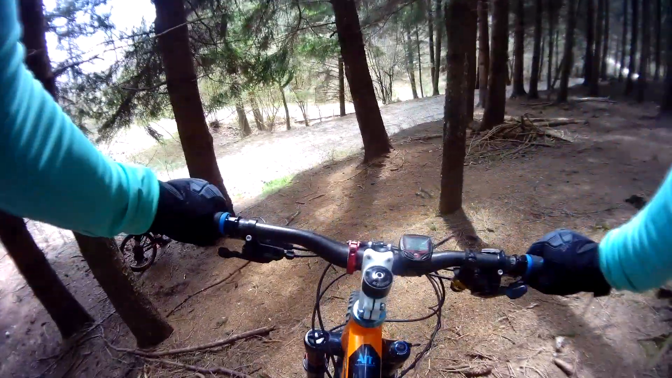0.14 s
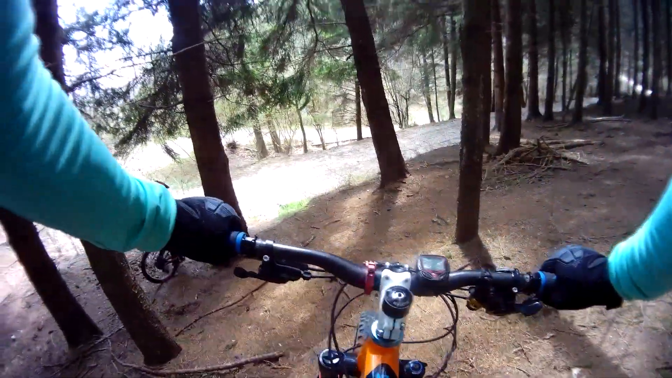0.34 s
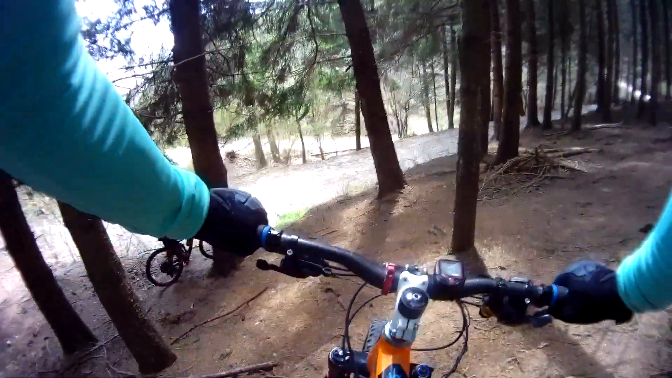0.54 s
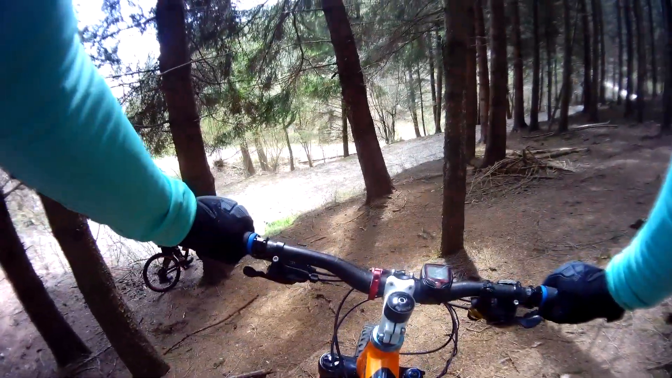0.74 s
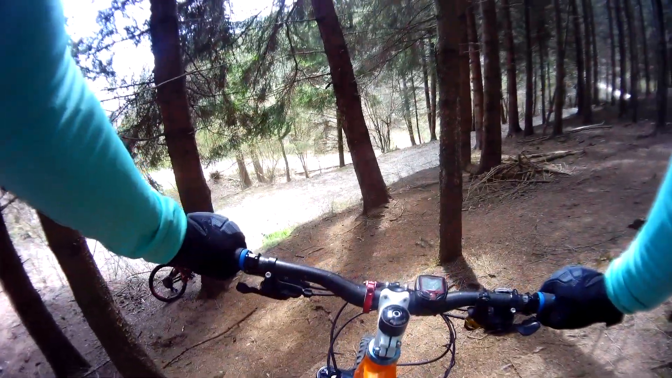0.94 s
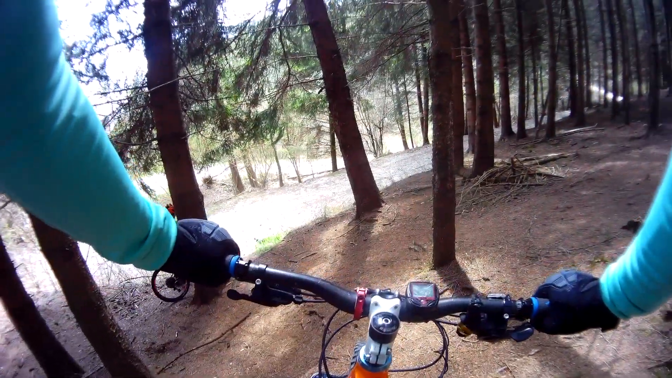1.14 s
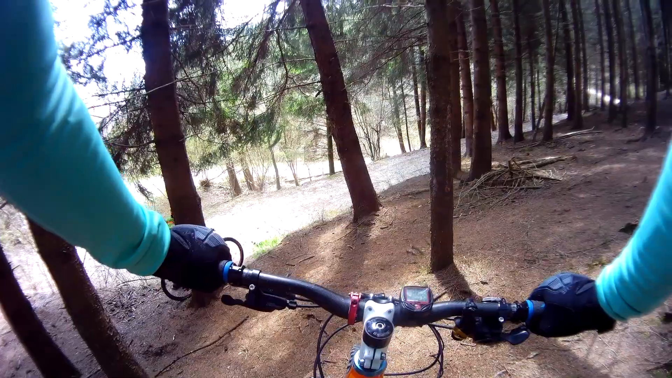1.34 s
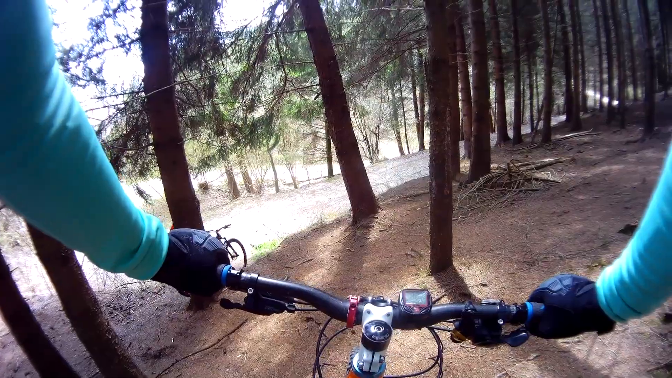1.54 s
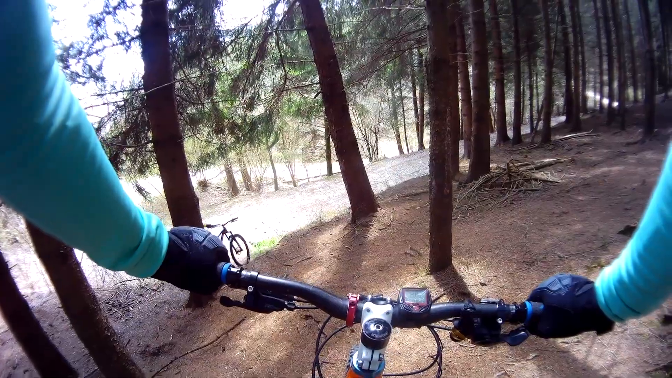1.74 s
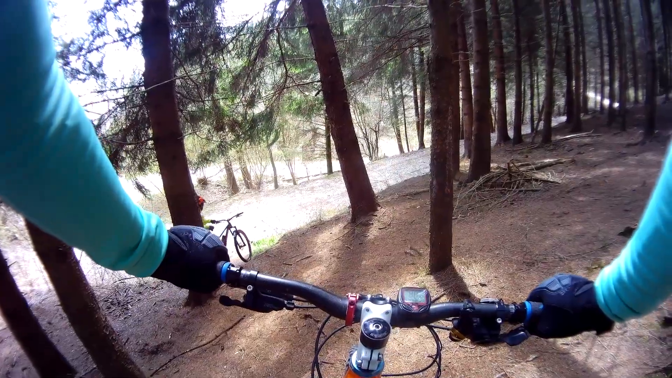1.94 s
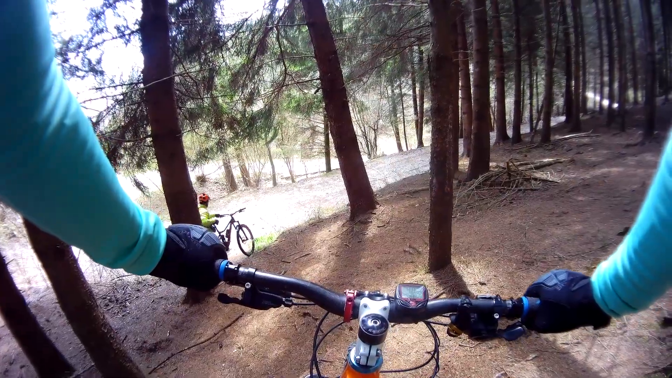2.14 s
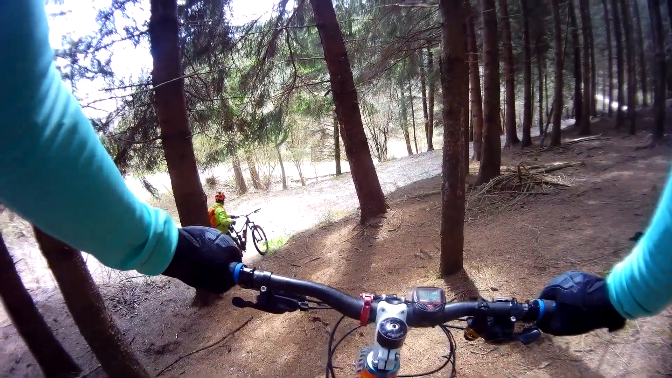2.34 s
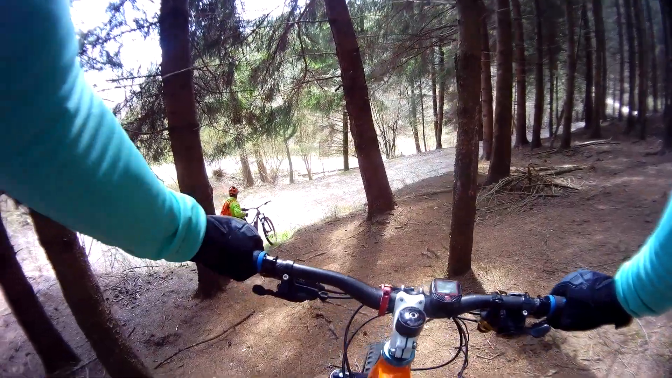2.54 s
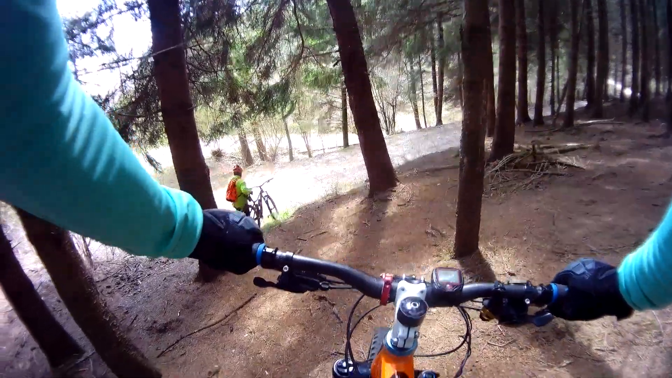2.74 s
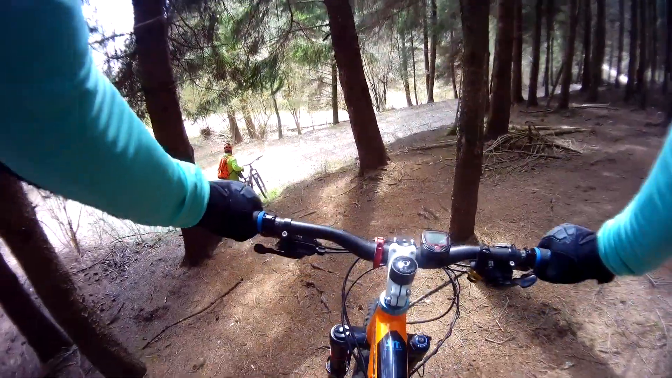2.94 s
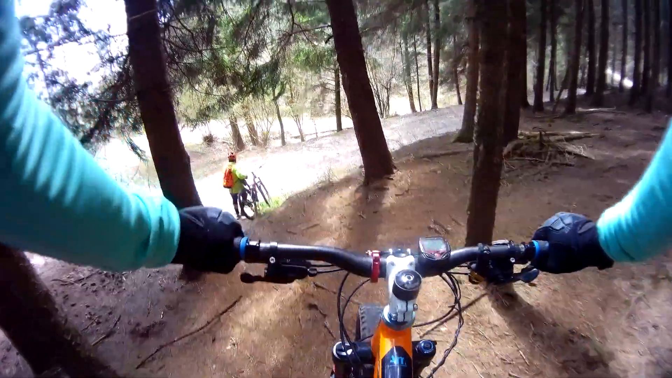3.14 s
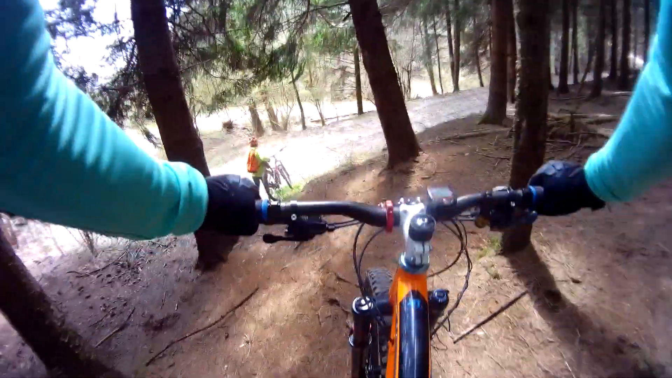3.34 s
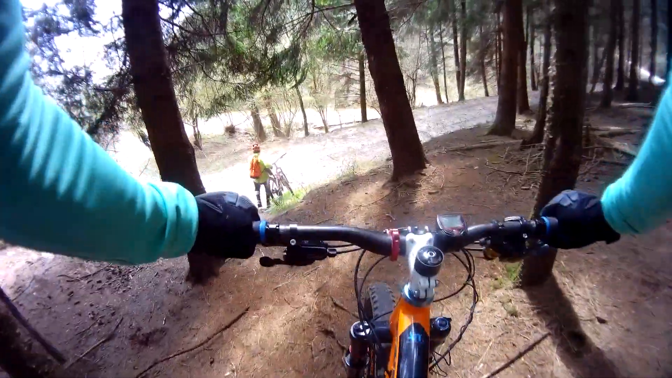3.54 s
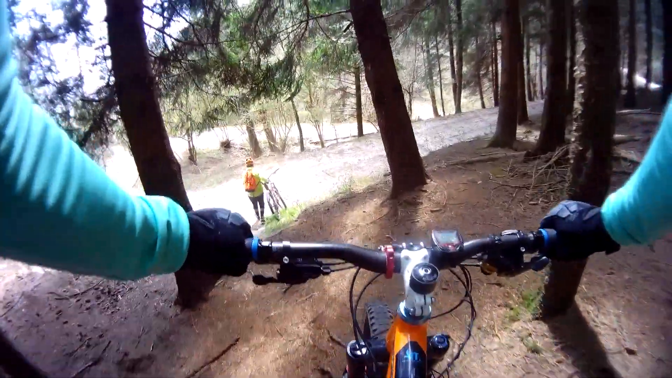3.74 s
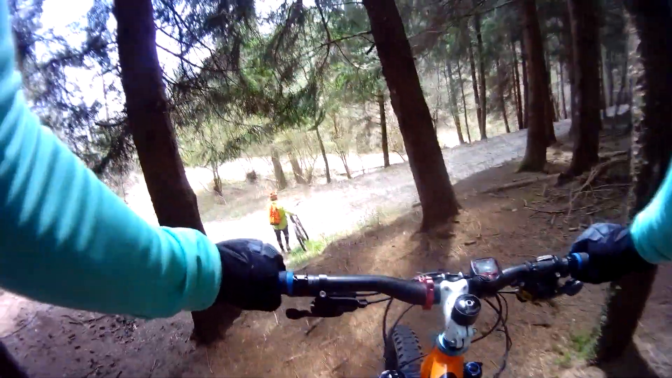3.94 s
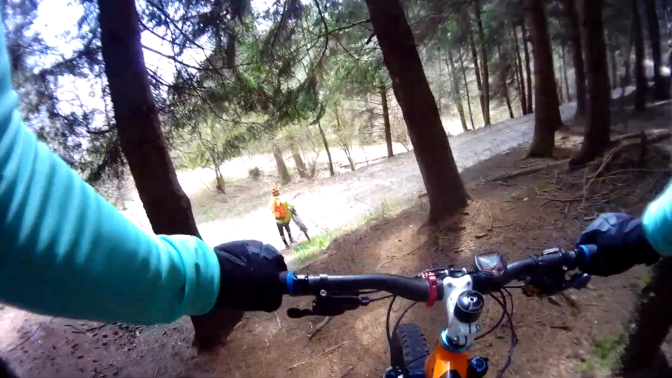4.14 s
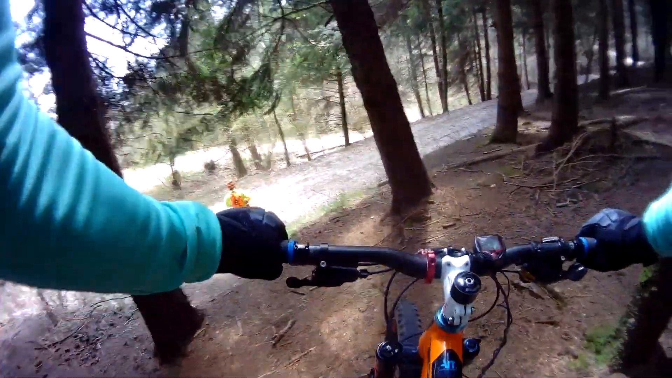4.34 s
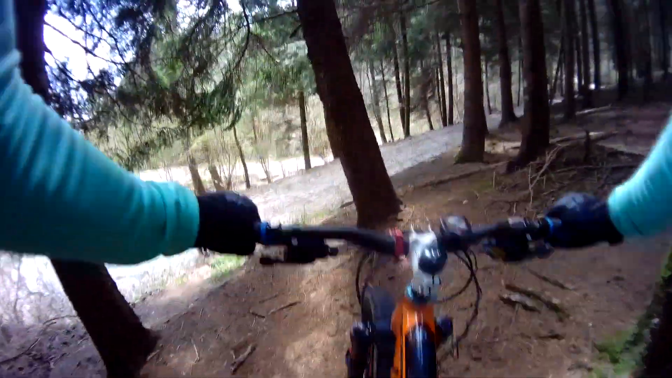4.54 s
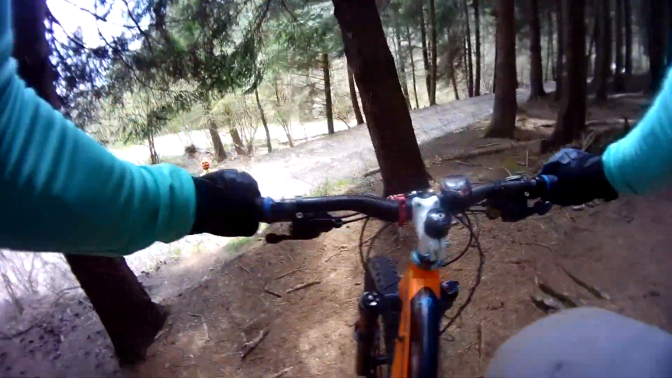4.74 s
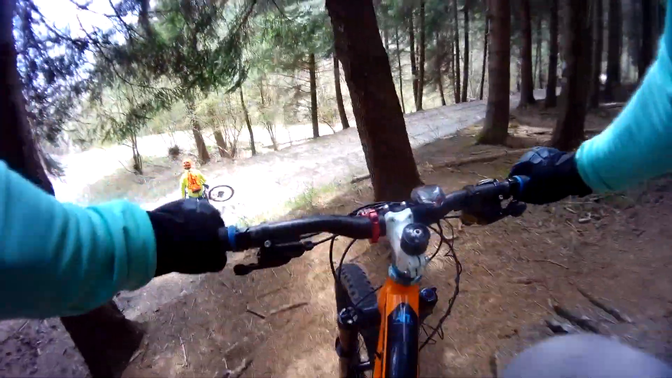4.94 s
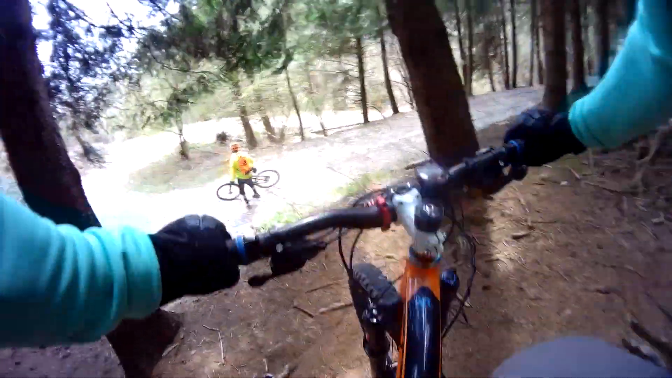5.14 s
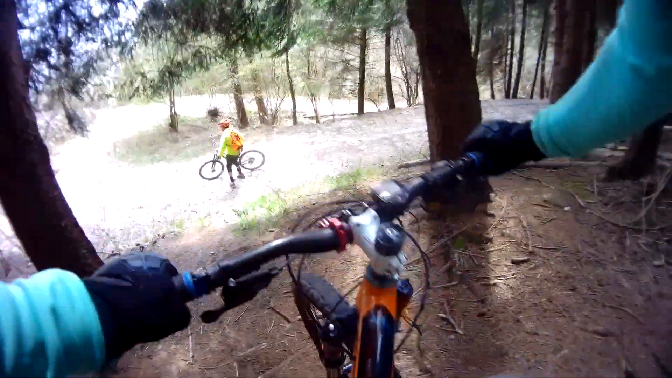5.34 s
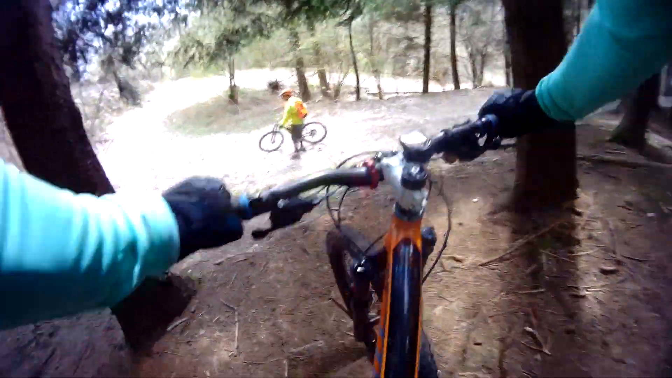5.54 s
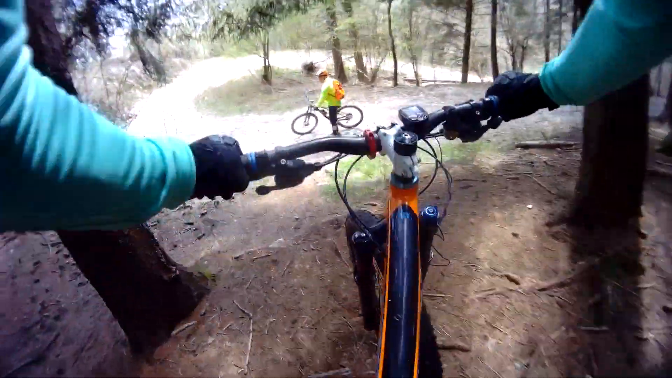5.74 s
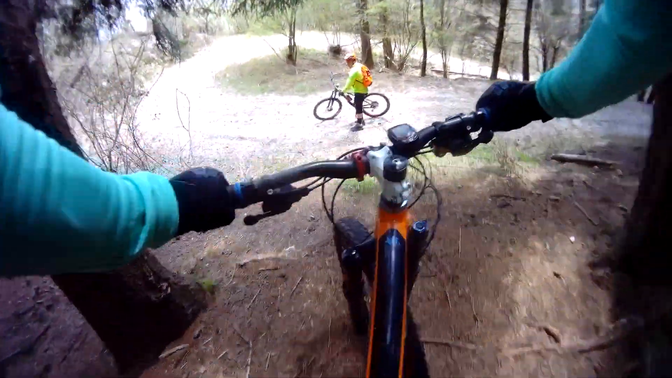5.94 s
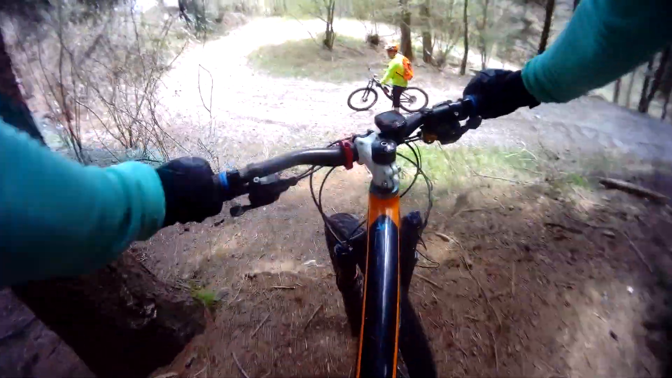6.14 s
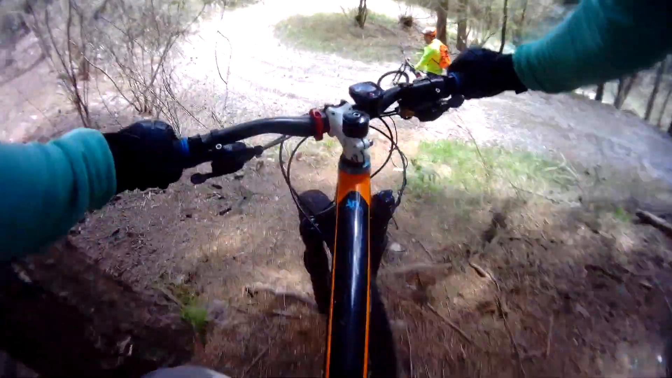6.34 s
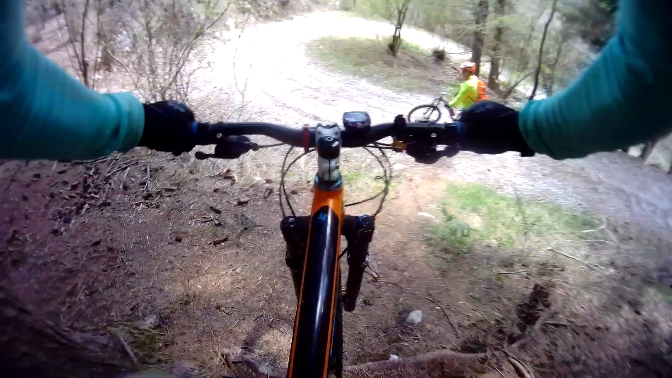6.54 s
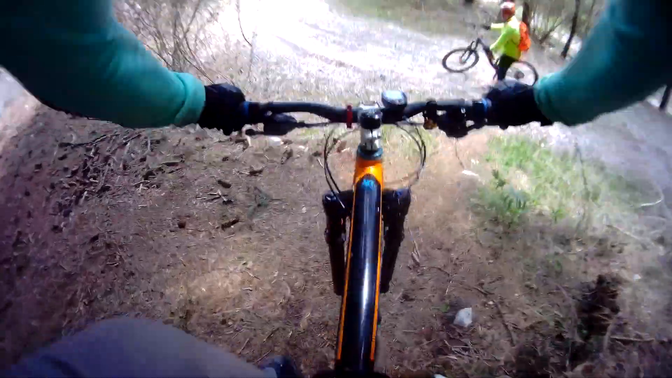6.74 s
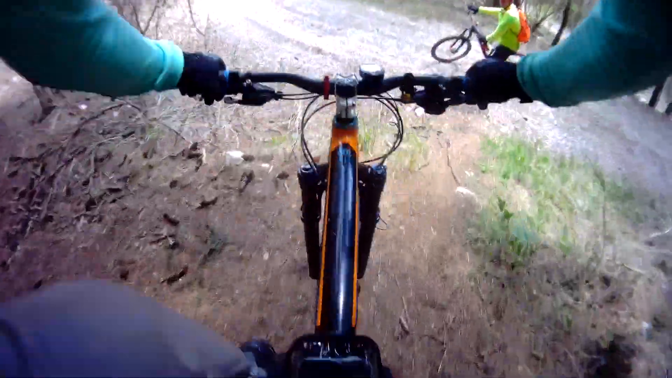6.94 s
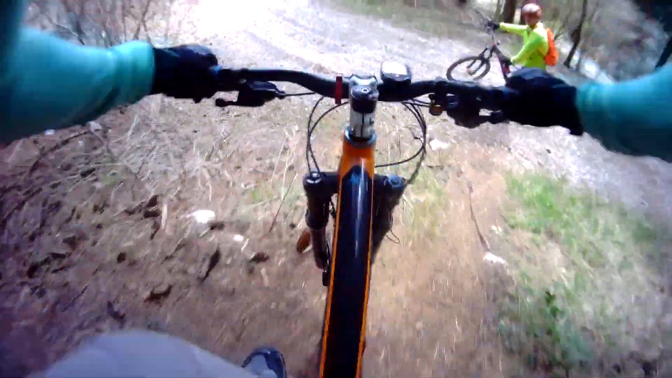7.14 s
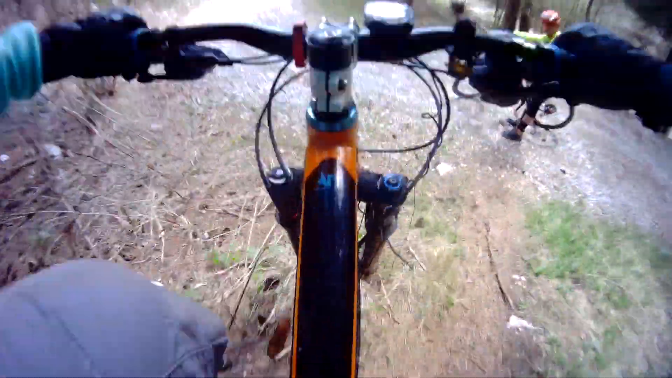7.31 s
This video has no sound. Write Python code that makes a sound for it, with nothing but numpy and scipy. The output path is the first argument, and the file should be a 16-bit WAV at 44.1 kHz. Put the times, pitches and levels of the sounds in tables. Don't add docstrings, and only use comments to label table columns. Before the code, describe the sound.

A mountain bike creeps with a slowing, ticking freewheel, nearly stops, then rolls down a dirt forest trail with crunching needles, snapping twigs and hard knocks.

```python
import sys
import numpy as np
from scipy import signal
from scipy.fft import rfft, irfft, next_fast_len
from scipy.io import wavfile
from scipy.ndimage import uniform_filter1d

SR = 44100
rng = np.random.default_rng(int(sys.argv[2]) if len(sys.argv) > 2 else 0)


def invert_db(level):
    return 10 ** (np.asarray(level, dtype=float) / 20)


def int16_out(signal):
    q = np.round(np.clip(np.atleast_2d(signal).T, -1, 1) * 32767)
    wavfile.write(sys.argv[1], SR, q.astype(np.int16))


N = 329471
TIME = np.arange(N) / SR

# time in seconds, weight on the tread in dB, litter dryness (crackle over crush) in dB.
ROLLING = [(0.0, -30.5, -10.5), (0.08, -44.5, -6.5), (0.58, -47.5, -8), (1.08, -71, 4), (1.52, -61, -6),
           (2.12, -68.5, -6), (2.43, -57.5, -9.5), (2.64, -48, -10), (3.1, -45, -6), (3.35, -40, -11),
           (4.02, -38, -13), (4.33, -43.5, -5), (4.76, -34, -12.5), (5.47, -42, -8), (5.85, -35.5, -10),
           (6.51, -40.5, -7), (7.05, -44.5, -3.5), (7.47, -34.5, -9)]
# time in seconds, tread swell in dB, housing jolt in dB, half length in seconds.
ROOTS = [(.17, 0, 15, .12), (0.447, 5.5, 25, 0.085), (2.698, 1, 6, 0.096), (3.208, -3, 11, .08),
         (3.638, 2, 15, 0.17), (4.176, 0, 7, 0.074), (4.468, 4, 15, .07), (4.614, 10.5, 13, 0.16),
         (5.076, 6.5, 12.5, 0.16), (5.264, 3, 9, 0.14), (5.381, 2, 10, 0.055), (5.661, 6, 6, 0.051),
         (5.92, -3, 2, 0.13), (6.18, 3, 12.5, 0.061), (6.285, 0.5, 12.5, 0.079), (6.658, 11, 4, 0.16),
         (6.903, 6.5, 13.5, 0.098), (7.015, -4, 9, 0.065), (7.255, 11, 13.5, 0.63)]
# start in seconds, level in dB, decay (t60) in seconds.
SKIDS = [
    (0.245, -59, 0.22),
    (0.389, -38.5, 0.22),
    (.72, -54, 2.9),
    (2.47, -55, 0.3),
    (3.029, -44.5, 0.97),
    (3.252, -38.5, 0.24),
    (5.408, -25.5, 0.038),
]
# start in seconds, end in seconds, extra crackle in dB.
DRY_PATCH = (3.2, 4.2, 4.1)
# frequency in Hz, level in dB per Hz.
CRUSH_COLOUR = [(71, -33), (120, -12.5), (292, -3), (412, 1.5), (941, -0.5), (1230, -0.5), (1460, -7),
                (2050, -4.5), (3830, -24.5), (5000, -27.5), (6500, -28), (11000, -120)]
# frequency in Hz, level in dB per Hz.
CRACKLE_COLOUR = [(2060, -18.5), (3500, -11.5), (3870, -18), (4600, -10.5), (5860, -7.5), (7900, -16.5),
                  (8910, -10), (10300, -13.5), (12400, -9), (14700, 0.5), (15300, 1.5), (16000, -6)]
CRACKLE_SHARE = 0.63

# time in seconds, peak in dB.
TEETH_SLOWING = [(0.151, -28.5), (0.276, -27), (.3483, -38), (0.3854, -28), (0.416, -28), (0.4883, -27),
                 (0.593, -28.5), (0.702, -29.5), (0.818, -28), (0.9377, -33.5), (1.044, -33.5),
                 (1.132, -35), (1.221, -37.5), (1.286, -48.5), (1.311, -36.5), (1.3995, -36.5),
                 (1.488, -38.5), (1.566, -38), (1.6159, -51), (1.648, -38), (1.7296, -46), (1.829, -47),
                 (1.941, -50), (2.0426, -49)]
# time in seconds, peak in dB.
TEETH_GAINING = [(2.127, -53), (2.21, -48), (2.2892, -46), (2.3592, -41.5), (2.4287, -39), (2.468, -34.5),
                 (2.487, -38), (2.5444, -39), (2.606, -37.5), (2.673, -34), (2.7374, -37), (2.806, -40),
                 (2.8447, -46), (2.877, -36.5), (2.9553, -37), (3.0474, -38), (3.085, -37), (3.124, -39),
                 (3.163, -42), (3.2078, -34.5), (3.277, -31), (3.3495, -38), (3.4702, -48), (3.5415, -34)]
# frequency in Hz, level in dB per Hz.
PAWL_COLOUR = [(2060, -30), (3500, -15), (4750, -17), (6400, -9.5), (7720, -45), (9760, -12),
               (10500, -17.5), (13400, 7), (15800, -13), (16500, -30)]
PAWL_T60_S = 0.056
HUB_FREE_DB, HUB_LOADED_DB, HUB_SLOPE = -16.5, -9, -0.18

# time in seconds, peak in dB, decay (t60) in seconds.
SNAPS = [(0.0544, -19.5, 0.015), (3.6603, -25, 0.012), (3.7362, -8, 0.007), (3.958, -35, 0.022),
         (4.1555, -8.5, 0.062), (4.2474, -15, 0.054), (4.307, -22, 0.027), (4.418, -24, 0.072),
         (4.4415, -15, 0.013), (4.533, -14.5, 0.057), (4.607, -21, 0.018), (4.656, -17, 0.02),
         (4.6895, -18.5, 0.05), (4.8504, -29, 0.022), (5.029, -19, 0.023), (5.101, -16.5, 0.036),
         (5.2672, -19, 0.026), (5.889, -28, 0.018), (6.1794, -39, 0.02), (6.542, -24, 0.1),
         (6.6248, -23, 0.029), (6.9674, -24, 0.026), (7.29, -12.5, 0.021), (7.3218, -32, 0.018),
         (7.3755, -29, 0.013), (7.379, -18, 0.016), (7.443, -20, 0.031)]
# frequency in Hz, level in dB per Hz.
SNAP_COLOUR = [(1760, -29), (3000, -12.5), (4110, -23), (5910, -1.5), (7370, -16.5), (8140, -15),
               (9190, -6), (10400, -11), (12000, -8), (14700, 6.5), (16500, -6.5)]

# time in seconds, peak in dB, pitch in Hz, decay (t60) in seconds.
TAPS = [(.032, -28, 503, .043), (.152, -33, 557, 0.055), (.244, -29.5, 1310, 0.11), (.39, -27, 1220, 0.049),
        (.401, -32, 388, 0.027), (.422, -26.5, 1160, 0.079), (.457, -33, 444, 0.045),
        (1.288, -44, 1000, 0.027), (1.312, -43.5, 1607, 0.099), (1.352, -38.5, 1160, 0.13),
        (1.388, -43, 1590, 0.15), (1.841, -44.5, 1047, 0.051), (2.467, -32.5, 1750, 0.038),
        (3.029, -27, 1080, 0.055), (3.251, -33, 845, 0.028), (4.1495, -20, 1820, 0.043),
        (4.416, -24, 630, 0.098), (4.795, -23.5, 510, 0.026), (6.584, -15, 568, 0.086),
        (5.543, -24.5, 865, 0.072), (5.594, -24, 1010, 0.034)]
# time in seconds, peak in dB, pitch in Hz, decay (t60) in seconds.
CLACKS = [
    (.052, -22, 482, 0.05),
    (.443, -33.5, 558, 0.072),
    (3.736, -20, 1640, 0.079),
    (3.787, -27, 645, 0.099),
    (3.967, -27, 494, 0.071),
    (4.431, -18.5, 960, 0.091),
    (5.264, -34, 1300, .037),
    (5.41, -22, 520, 0.052),
    (6.051, -20, 960, 0.079),
    (6.79, -20, 1230, 0.035),
]
# time in seconds, peak in dB, pitch in Hz, decay
# (t60) in seconds.
BLOWS = [(3.533, -23.5, 970, 0.076), (3.586, -18.5, 2050, 0.13), (3.846, -23.5, 1290, 0.048),
         (4.157, -4.5, 1320, 0.074), (4.246, -11.5, 1200, 0.083), (4.464, -16, 756, 0.076),
         (4.527, -25, 394, 0.047), (4.544, -24, 606, 0.11), (4.6076, -2.5, 1100, 0.023),
         (5.0275, -10.5, 910, 0.031), (5.304, -10, 1710, 0.1), (5.393, -24, 564, 0.045),
         (6.142, -18, 1240, 0.038), (6.436, -21.5, 1250, 0.081), (6.457, -17.5, 465, 0.043),
         (6.5028, -7.5, 1260, .018), (6.847, -21, 503, 0.099), (6.967, -21.5, 910, 0.07),
         (7.0, -20.5, 413, 0.039), (7.17, -12.5, 895, 0.045), (7.216, -12.5, 1150, 0.041),
         (7.266, -10.5, 1010, 0.048), (7.2895, -2.5, 920, 0.085), (7.3215, -10.5, 790, 0.02)]
TAP_EDGE_DB, CLACK_EDGE_DB, BLOW_EDGE_DB = -20, 14.5, -20
THUD_DB, THUD_DB_PER_OCTAVE, THUD_DB_PER_S = -19.5, -10, 113
SOFT_RISE_S = .005
# frequency in Hz, level in dB, decay (t60) in seconds.
MOUNT_MODES = [(173.2, -38, 0.75), (370, -5.5, 0.018), (345, -27.5, 0.3), (467, -21.5, 0.12),
               (643, -4.5, 0.013), (1320, -31, 0.025), (13700, 0, 0.005)]
MOUNT_HIT_S = 0.0026
# time in seconds, peak in dB, pitch in Hz.
SPOKE_PING = (7.3738, -11.5, 5800)
# peak time in seconds, peak in dB, pitch in Hz, rise in seconds, t60 in seconds.
SHOVES = [(4.439, -23.5, 2610, .002, 0.022), (4.6152, -12, 994, 0.0026, 0.026),
          (4.6177, -17.5, 1880, 0.0039, 0.014), (4.628, -20, 750, .004, 0.05),
          (4.655, -12.5, 1950, .003, .025), (4.664, -23, 602, 0.0025, 0.052),
          (4.68, -15, 1710, 0.0013, 0.036), (4.691, -18.5, 1900, 0.0066, 0.039),
          (4.709, -24, 1880, 0.0018, 0.018), (4.741, -30, 1403, .003, 0.034),
          (4.822, -17.5, 1306, 0.0024, 0.071), (5.001, -19.5, 908, .003, 0.022),
          (5.039, -17, 1000, .002, 0.014), (5.056, -18, 1490, 0.0014, 0.026),
          (5.068, -17.5, 1195, 0.0037, 0.024), (5.104, -16.5, 1280, 0.002, 0.026),
          (5.215, -31, 2200, 0.0018, 0.046), (5.312, -16.5, 1810, .003, 0.034),
          (5.322, -25.5, 2620, 0.0027, 0.025), (5.412, -27.5, 2580, .003, 0.033),
          (5.396, -30, 2700, 0.0016, .03), (5.65, -23.5, 815, .008, 0.087), (6.48, -12, 620, 0.012, 0.11),
          (6.525, -20, 2650, .001, 0.037), (6.546, -6.5, 992.5, 0.0032, 0.032),
          (6.552, -7.5, 1102, .002, .03), (6.558, -11.5, 1039, .002, 0.072),
          (6.626, -9.5, 840, 0.0022, 0.035), (6.642, -22.5, 1680, .004, 0.038),
          (6.686, -25, 1202, 0.0022, .02), (6.735, -29, 1260, .002, .02), (6.858, -26, 2080, 0.0017, .03),
          (6.923, -31, 1260, .002, .03), (7.159, -25, 1214, 0.0034, 0.027),
          (7.283, -17.5, 690, 0.0033, 0.023), (7.296, -13, 893, .002, 0.035),
          (7.34, -15, 1275, 0.0022, 0.033), (7.35, -17, 1197, 0.0039, 0.037),
          (7.383, -11, 1952, 0.0011, 0.017), (7.424, -28, 983, .002, .04)]

# start in seconds, end in seconds, first level in dB, last level in dB.
LEVER_PULLS = [
    (2.44, 2.946, -53, -56),
    (3.023, 3.2, -46, -41),
    (3.273, 3.532, -43, -46),
    (3.777, 3.89, -40, -55),
    (4.62, 4.852, -43, -41.5),
    (5.072, 5.404, -37.5, -45.5),
    (5.606, 7.1, -37.5, -40.5),
    (7.1, 7.497, -42, -37),
]
LEVER_DB_PER_S, PAD_DRAG_DB = 202, -77
# frequency in Hz, width in Hz, level in dB.
SCRAPE_MODES = [(570, 320, -1), (1290, 163, 4), (1986, 280, -3.5), (5140, 360, -11.5), (5900, 770, -5.5)]
# frequency in Hz, width in Hz, level in dB.
DRAG_MODES = [(444, 67, 0.5), (803, 65, -6.5), (1120, 80, -3), (1347, 50, -0.5), (1654, 78, -1.5),
              (2040, 66, -4), (2750, 80, -16)]
# start in seconds, end in seconds, level in dB.
DRAGS = [
    (0.498, .7, -59.5),
    (.72, 0.937, -59),
    (2.53, 2.7, -56.5),
    (2.7, 2.993, -52),
]
# frequency in Hz, width in Hz, level in dB.
BITE_MODES = [(630, 120, -5), (1160, 120, -1), (2015, 83, -9)]
# start in seconds, end in seconds, level in dB.
BITES = [
    (3.013, 3.184, -44.5),
    (3.28, 3.5, -44.5),
    (5.617, 6.43, -48.5),
]
# frequency in Hz, width in Hz, level in dB.
HISS_MODES = [(5070, 200, -9), (5710, 150, -6), (5990, 170, -3), (6320, 200, -9)]
# start in seconds, end in seconds, level in dB.
HISSES = [
    (3.27, 3.53, -53),
    (5.62, 6.5, -59),
    (6.7, 7.1, -56),
]
# start in seconds, end in seconds, first pitch in Hz, last pitch in Hz, level in dB.
SQUEAK = (2.9, 3.02, 4400, 3950, -61)

# time in seconds, peak in dB.
GRIT = [(3.6311, -25), (3.8452, -29), (3.9384, -25), (4.2188, -24), (4.5374, -26), (4.5474, -22),
        (4.6134, -25), (4.7716, -33), (4.8763, -21), (4.881, -20), (4.9776, -29), (5.0494, -32),
        (5.1672, -35), (5.2879, -34), (5.3472, -30), (5.4605, -31), (5.4809, -35), (5.5039, -31),
        (5.5268, -29), (5.6331, -30), (5.672, -28), (5.7304, -32), (5.8591, -40), (5.875, -28),
        (5.9698, -34), (6.1494, -33), (6.2253, -36), (6.2766, -41), (6.355, -30), (6.4033, -36),
        (6.5854, -22), (6.7181, -28), (6.7361, -29), (6.778, -25), (6.8014, -25), (7.003, -30),
        (7.0244, -29), (7.1147, -28), (7.198, -34), (7.4544, -24)]
# start in seconds, end in seconds, level in dB.
SLEEVE = [
    (1.332, 1.436, -67),
    (1.616, 1.86, -70.5),
]
# start in seconds, added rumble in dB.
STEEPER = [
    (3.15, 5.5),
    (5.9, 13.5),
]
RUMBLE_UNDER_DB, BREEZE_DB = -21, -73.5
# frequency in Hz, level in dB per Hz.
WOOD_COLOUR = [(15, -27), (25, 0.5), (226, -1), (280, 3.5), (496, -2), (1220, -24), (1430, -6),
               (2270, -17.5), (2750, -10.5), (8830, -14.5), (14000, -9.5), (15200, -15), (16500, -33)]
WOOD_DB = -68.5
TOP_HZ = 15740


def unit(x):
    return x / np.sqrt(np.mean(x ** 2))


def peak(x):
    return x / abs(x).max()


def colour(x, table):
    hz, db = np.transpose(table)
    size = 4096
    grid_hz = np.arange(size // 2 + 1) * SR / size
    gain = np.interp(np.log(grid_hz + 1), np.log(hz), db) * np.log(10) / 20
    ceps = irfft(gain)
    ceps[1:size // 2] *= 2
    ceps[size // 2 + 1:] = 0
    return signal.fftconvolve(x, irfft(np.exp(rfft(ceps))))[:len(x)]


def band(x, hz, width):
    return signal.lfilter(*signal.iirpeak(hz, hz / width, fs=SR), x)


def band_twice(x, hz, width):
    return band(band(x, hz, width), hz, width)


def walk(rate):
    hold = int(SR / rate)
    steps = np.repeat(rng.standard_normal(N // hold + 1), hold)
    return unit(uniform_filter1d(uniform_filter1d(steps, hold), hold)[:N])


def gate(start, end, edge_s=.03):
    return np.clip(np.minimum(TIME - start, end - TIME) / edge_s + .5, 0, 1)


def fade(t60, size=4000):
    return invert_db(-60 * np.arange(size) / SR / max(t60, 1e-3))


def ring(hz, t60, size=4000):
    return np.sin(2 * np.pi * hz * np.arange(size) / SR) * fade(t60, size)


def add(out, s, sound):
    i = int(max(s, 0) * SR)
    out[i:i + len(sound)] += sound[:len(out) - i]


def impulses(rate, spread_db):
    chance, size = rng.random(N), rng.exponential(size=N)
    return (chance < rate / SR) * invert_db(spread_db * np.minimum(size, 3))


def grains(rate, spread_db):
    starts = impulses(rate, spread_db)
    return unit(rng.standard_normal(N) * signal.fftconvolve(starts, fade(0.01, size=800))[:N])


def controls():
    s, weight_db, dry_db = np.transpose(ROLLING)
    weight_db, dry_db = np.interp(TIME, s, weight_db), np.interp(TIME, s, dry_db)
    swell_db, jolt_db = np.zeros((2, N))
    for at, tread_db, housing_db, half_s in ROOTS:
        hump = np.clip(1 - abs(TIME - at) / max(half_s, .01), 0, 1)
        swell_db += tread_db * hump
        jolt_db += housing_db * hump
    crush_db = weight_db + swell_db
    brittle_db = DRY_PATCH[2] * gate(*DRY_PATCH[:2])
    crackle_db = weight_db + dry_db + CRACKLE_SHARE * swell_db + brittle_db
    steep_db = sum(db * gate(start, np.inf, 0.11) for start, db in STEEPER)
    rumble_db = np.maximum(weight_db + RUMBLE_UNDER_DB + steep_db + jolt_db, BREEZE_DB)
    rub_db = np.full(N, 1. * PAD_DRAG_DB)
    for start, end, first_db, last_db in LEVER_PULLS:
        off_s = np.maximum(np.maximum(start - TIME, TIME - end), 0)
        pull_db = np.interp(TIME, (start, end), (first_db, last_db))
        rub_db = np.maximum(rub_db, pull_db - LEVER_DB_PER_S * off_s)
    return crush_db, crackle_db, rumble_db, rub_db


def tyres(crush_db, crackle_db):
    noise = rng.standard_normal((3, N))
    load = np.clip((crush_db + 65) / 25, .3, 1)
    bed = 1.3 * noise[0] * invert_db(3.1 * load * walk(25))
    lumps = .5 * grains(150, 8.1) + 0.29 * pebbles(30, 3.8, 4.6)
    crush = unit(colour(bed + load * lumps, CRUSH_COLOUR)) * invert_db(crush_db - 0.62)
    bite = np.zeros(N)
    for s, db, t60 in SKIDS:
        add(bite, s, invert_db(db) * fade(t60, size=40000))
    crush = crush + bite * unit(colour(noise[2], CRUSH_COLOUR))
    crackle = 0.69 * noise[1] * invert_db(2.1 * walk(30) + 1.5 * walk(9)) + 0.4 * grains(400, 3.0)
    return crush, unit(colour(crackle, CRACKLE_COLOUR)) * invert_db(crackle_db + 4.0)


def pebbles(rate, spread_db, sharp):
    out = np.zeros(N)
    for hz in np.geomspace(220, 3000, 16):
        out += np.sqrt(hz) * unit(band_twice(impulses(rate, spread_db), hz, hz / sharp))
    return unit(out)


def patchy(x, depth_db):
    size = next_fast_len(N)
    z, hz = rfft(x, size), np.arange(size // 2 + 1) * SR / size
    edges = np.append(0, np.geomspace(3300, 24000, 10))
    out = np.zeros(N)
    for lo, hi in zip(edges, edges[1:]):
        out += irfft(z * (hz >= lo) * (hz < hi), size)[:N] * invert_db(depth_db * walk(35))
    return out


def freewheel():
    out = np.zeros(N)
    teeth = [(*row, HUB_FREE_DB) for row in TEETH_SLOWING] + [(*row, HUB_LOADED_DB) for row in TEETH_GAINING]
    for s, db, hub_db in teeth:
        hub_db = hub_db + HUB_SLOPE * (db + 44.0)
        noise, lag = rng.standard_normal(2000), rng.random(2)
        shape = fade(PAWL_T60_S, size=2000)
        for at, share in zip(lag * .002 + [.0025, .006], (.8, .4)):
            add(shape, at, share * fade(0.25 * PAWL_T60_S, size=2000))
        burst = noise * (shape + 0.45 * fade(0.011, size=2000))
        hub = (.7 + .6 * lag[1]) * peak(band(band(burst, 2380, 200), 2380, 350))
        hub = hub + .6 * peak(band(band(burst, 4950, 800), 4950, 1100))
        hub = hub + (.8 if s < 1.0 else .1) * peak(band(band(burst, 1650, 250), 1670, 400))
        add(out, s - .0008, invert_db(db - 1.5) * (peak(colour(burst, PAWL_COLOUR)) + invert_db(hub_db + 1.5) * hub))
    return out


def snaps():
    out = np.zeros(N)
    for s, db, t60 in SNAPS:
        shape = 2.0 * fade(0.041 * t60) + fade(t60) + 0.089 * fade(6.0 * t60)
        burst = rng.standard_normal(4000) * shape
        burst[0] += 6
        add(out, s - .0008, invert_db(db + 3.5) * peak(colour(burst, SNAP_COLOUR)))
    return out


def blow(hz, t60, edge_db):
    thud_db = THUD_DB + THUD_DB_PER_OCTAVE * np.log2(hz / 800) + THUD_DB_PER_S * (t60 - .05)
    noise, crumbs = rng.standard_normal((2, 4000))
    touch = invert_db(4.0 * unit(uniform_filter1d(crumbs, size=60)))
    burst = noise * (touch * fade(t60) + 0.038 * fade(1.2 * t60))
    burst = burst + 0.097 * noise * fade(t60)
    rise_s = SOFT_RISE_S * min((t60 / .11) ** 2 * (600 / hz) ** 4, 1)
    burst = burst * (1 - np.exp(-TIME[1:4001] / rise_s))
    burst[0] += 20 * np.exp(-rise_s / .002)
    tone = band(band(burst, hz, 0.27 * hz), hz, 0.76 * hz)
    body = band(band(burst, 743, 820), 707, 860)
    edge = band_twice(burst, 2600, 1300)
    thud = band_twice(burst, 270, 160)
    main = peak(0.46 * peak(tone) + 0.5 * peak(body))
    return main + invert_db(edge_db - 22.0) * peak(edge) + invert_db(thud_db + 1.5) * peak(thud)


def knocks():
    out = np.zeros(N)
    for table, edge_db in ((TAPS, TAP_EDGE_DB), (CLACKS, CLACK_EDGE_DB), (BLOWS, BLOW_EDGE_DB)):
        for s, db, hz, t60 in table:
            add(out, s - .0003, invert_db(db) * blow(hz, t60, edge_db))
    return signal.sosfilt(signal.butter(4, 3600, fs=SR, output="sos"), out)


def mount_and_spoke():
    out = np.zeros(N)
    thump = -sum(invert_db(db) * ring(hz, t60, size=30000) for hz, db, t60 in MOUNT_MODES)
    rattle = peak(band(rng.standard_normal(4000) * fade(0.014), 2900, 1800))
    add(out, MOUNT_HIT_S, signal.sosfilt(signal.butter(6, 135, "high", fs=SR, output="sos"), thump))
    add(out, MOUNT_HIT_S, invert_db(-12.0) * rattle)
    s, db, hz = SPOKE_PING
    add(out, s, invert_db(db) * peak(band(rng.standard_normal(4000) * fade(0.01), hz, 4500)))
    return out


def shoves():
    out, lead = np.zeros(N), 600
    for s, db, hz, rise_s, t60 in SHOVES:
        swell = np.exp(-(TIME[lead:0:-1] / max(rise_s, 3e-4)) ** 2)
        shape = np.append(swell, fade(t60, size=3400))
        noise = rng.standard_normal((2, 4000))
        wobble = 1 + .12 * unit(uniform_filter1d(noise[0], size=80))
        tone = np.sin(2 * np.pi * hz * np.cumsum(wobble) / SR)
        scuff = unit(band_twice(noise[1], hz, 0.75 * hz))
        thud = band_twice(shape * noise[0], 290, 270)
        edge = band(band(shape * noise[1], 5800, 2200), 4800, 2800)
        start = s - lead / SR
        add(out, start, invert_db(db) * peak(shape * (tone + 0.75 * scuff)))
        add(out, start, invert_db(db - 11.0) * peak(thud))
        add(out, start, invert_db(db - 22.5) * peak(edge))
    return out


def brake(db):
    scrape = rng.standard_normal(N) * invert_db(3.95 * walk(40))
    on = np.clip((TIME - 2.44) / .05, 0, 1)
    return on * invert_db(db - 7.0) * sum(invert_db(g) * unit(band_twice(scrape, f, w)) for f, w, g in SCRAPE_MODES)


def discs():
    out = np.zeros(N)
    for modes, spans in ((DRAG_MODES, DRAGS), (BITE_MODES, BITES), (HISS_MODES, HISSES)):
        sing = np.zeros(N)
        for hz, width, db in modes:
            sing += invert_db(db + 2 * walk(18)) * unit(band_twice(rng.standard_normal(N), hz, width))
        out += unit(sing) * sum(invert_db(db) * gate(start, end, 0.045) for start, end, db in spans)
    return out


def squeak():
    start, end, from_hz, to_hz, db = SQUEAK
    along = np.clip((TIME - start) / (end - start), 0, 1)
    hz = to_hz + (from_hz - to_hz) * np.exp(-4 * along) + 25 * walk(300)
    return invert_db(db) * np.sin(np.pi * along) ** .5 * np.sin(2 * np.pi * np.cumsum(hz) / SR)


def grit():
    out = np.zeros(N)
    for s, db in GRIT:
        burst = rng.standard_normal(1500) * (fade(0.019, size=1500) + .15 * fade(.08, size=1500))
        add(out, s - .0005, invert_db(db - 3.3) * peak(band(band(burst, 14600, 3500), 14000, 6000)))
    return out


def sleeve():
    swish = unit(band(band(rng.standard_normal(N), 6600, 1300), 5900, 1300)) * invert_db(2.4 * walk(24.9))
    return swish * sum(invert_db(db) * gate(start, end, 0.09) for start, end, db in SLEEVE)


def rumble(db):
    out = np.zeros(N)
    for hz, band_db in ((28, -7.5), (50, -6.5), (75, -10.0), (120, -8.0)):
        out += invert_db(band_db + 4.45 * walk(8)) * unit(band_twice(rng.standard_normal(N), hz, 1.7 * hz))
    return out * invert_db(db - 3.0)


def still_wood():
    return unit(colour(rng.standard_normal(N), WOOD_COLOUR)) * invert_db(WOOD_DB)


def scene():
    crush_db, crackle_db, rumble_db, rub_db = controls()
    crush, crackle = tyres(crush_db, crackle_db)
    rolling = crush + patchy(crackle, depth_db=2) + freewheel()
    hits = snaps() + knocks() + mount_and_spoke() + shoves() + grit()
    braking = brake(rub_db) + discs() + squeak()
    background = sleeve() + rumble(rumble_db) + still_wood()
    return (rolling + hits + braking + background)[None]


def thin_treble(x, under_db, hole_db):
    hz, _, z = signal.stft(x, SR, nperseg=1024)
    size = 7
    power = np.add.reduceat(abs(z) ** 2 + 1e-18, np.arange(0, len(hz), size))
    level_db = uniform_filter1d(10 * np.log10(power), size=3, axis=1)
    sunk = level_db - uniform_filter1d(level_db, size=9, axis=0) < under_db
    treble = (hz[:, None] > 4200) & (hz[:, None] < 14000)
    drop = np.repeat(sunk, size, axis=0)[:len(hz)] & treble
    return signal.istft(z * invert_db(hole_db * drop), SR, nperseg=1024)[1][:N]


def band_limit(x):
    return signal.sosfilt(signal.butter(12, 16990, fs=SR, output="sos"), x)


def record(dry):
    rounded = np.tanh(0.74 * dry[0]) / 0.86
    dull = signal.sosfiltfilt(signal.ellip(10, .1, 50, TOP_HZ, fs=SR, output="sos"), rounded)
    top = rounded - dull
    sharp = uniform_filter1d(top ** 2, size=256) > invert_db(-31) ** 2
    cracks = .6 * top * uniform_filter1d(1. * sharp, size=128)
    mix = thin_treble(dull, under_db=-3.3, hole_db=-25) + cracks
    return band_limit(mix[None])


dry = scene()
out = record(dry)
int16_out(out)
```